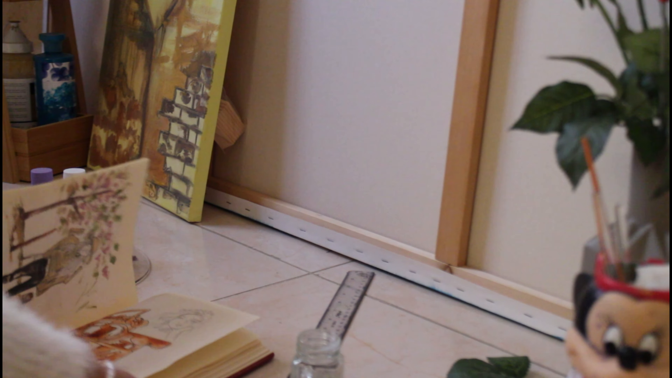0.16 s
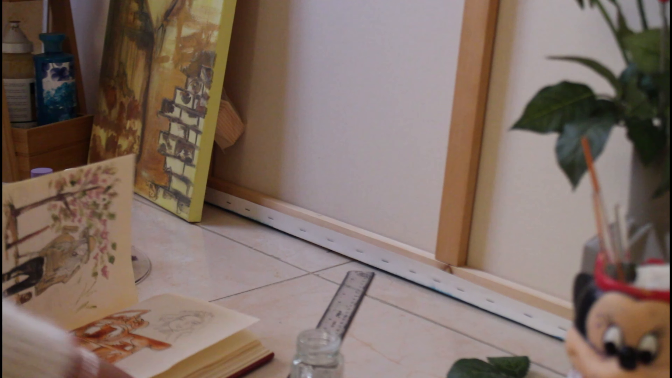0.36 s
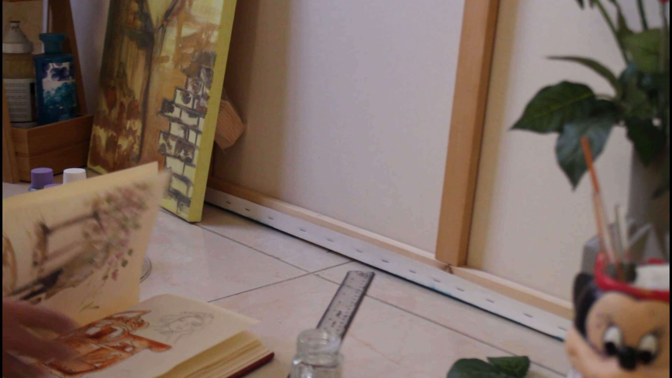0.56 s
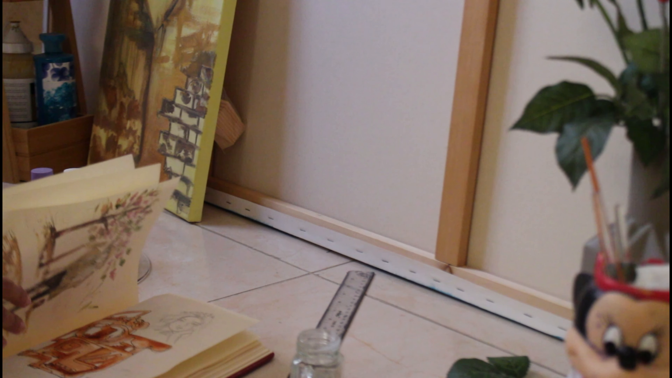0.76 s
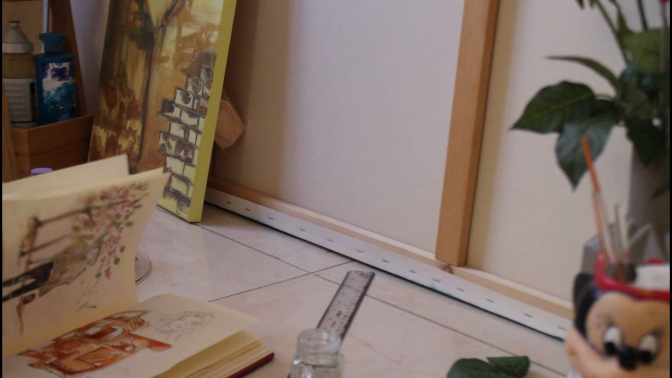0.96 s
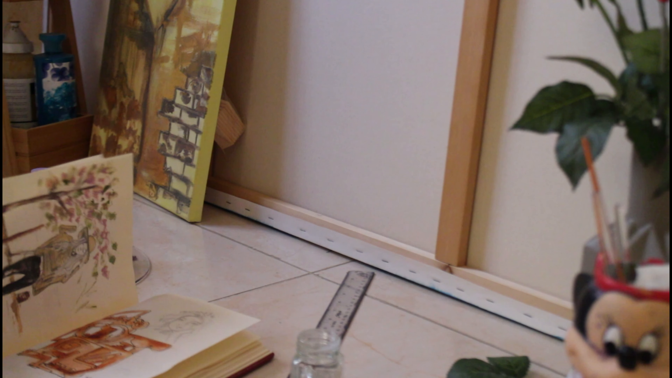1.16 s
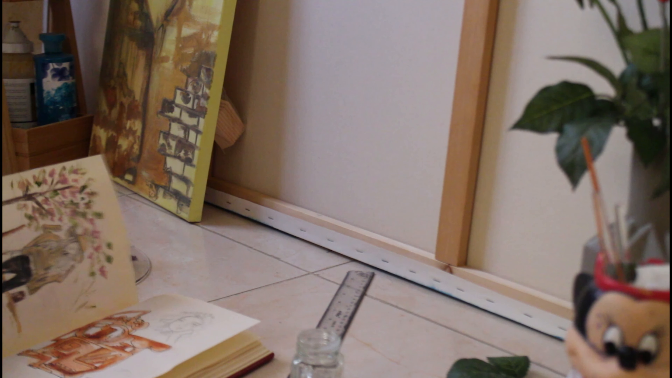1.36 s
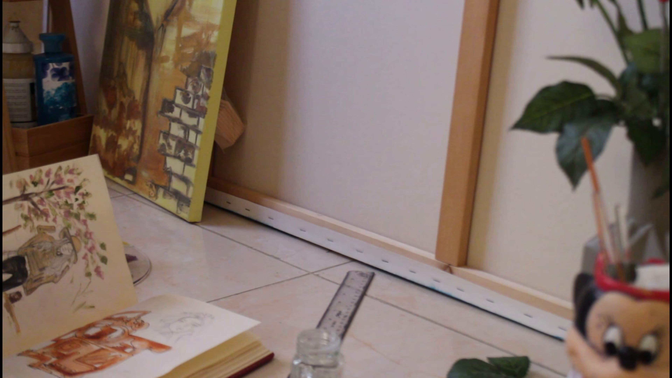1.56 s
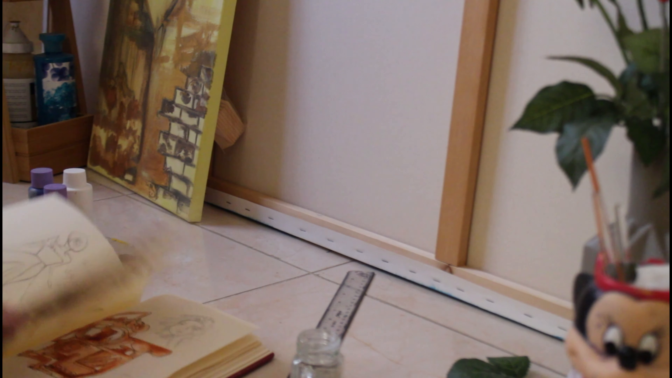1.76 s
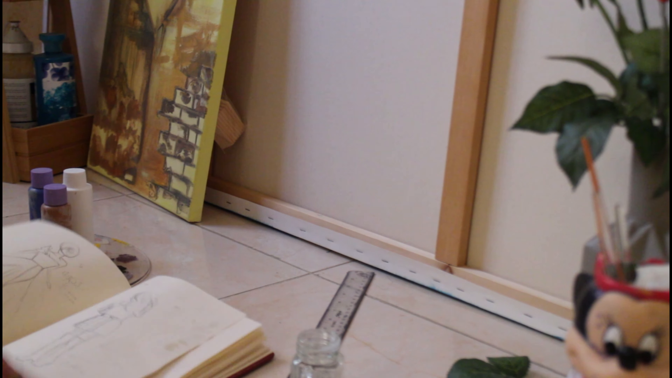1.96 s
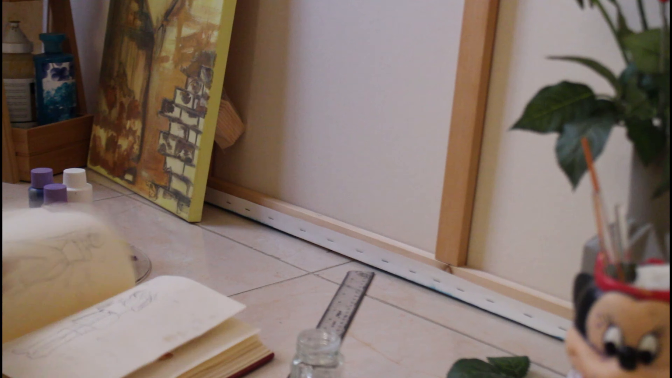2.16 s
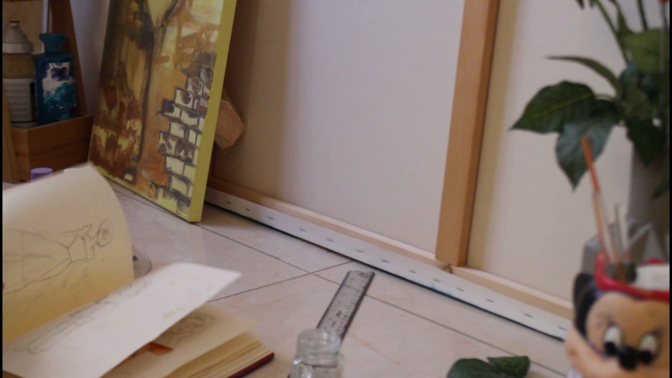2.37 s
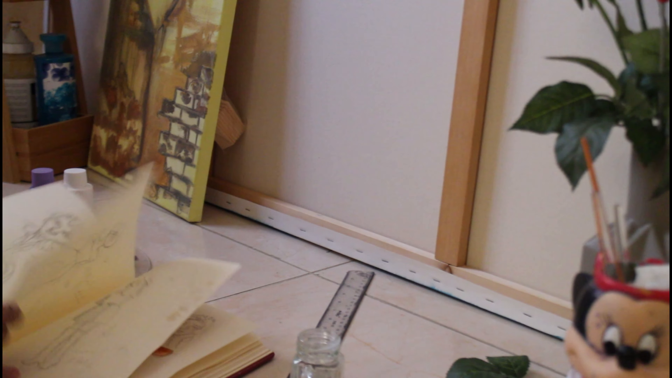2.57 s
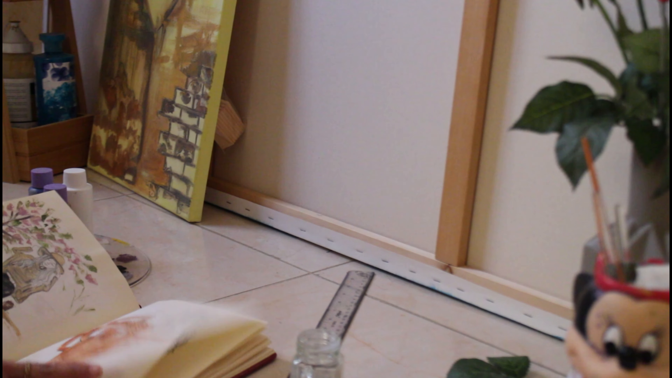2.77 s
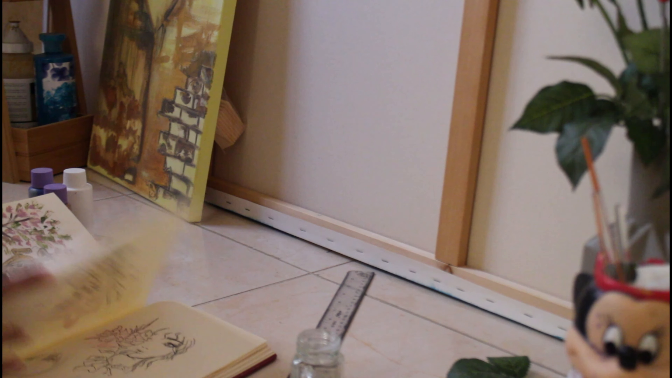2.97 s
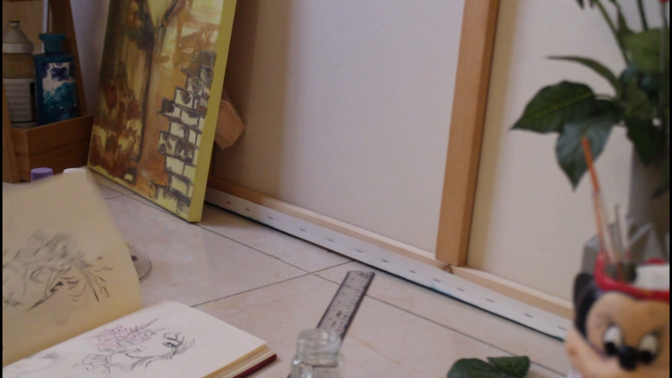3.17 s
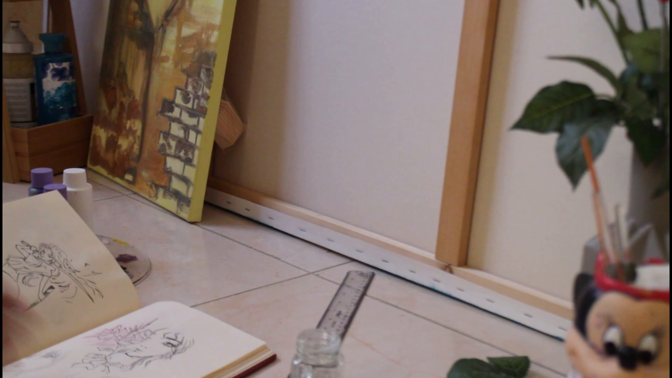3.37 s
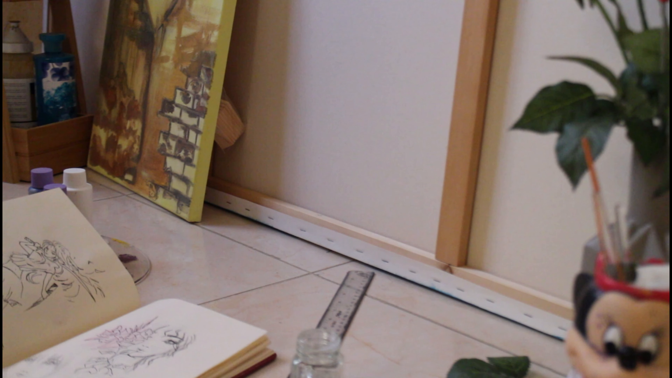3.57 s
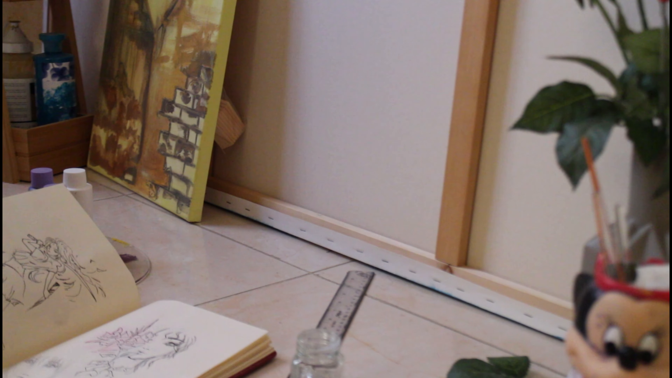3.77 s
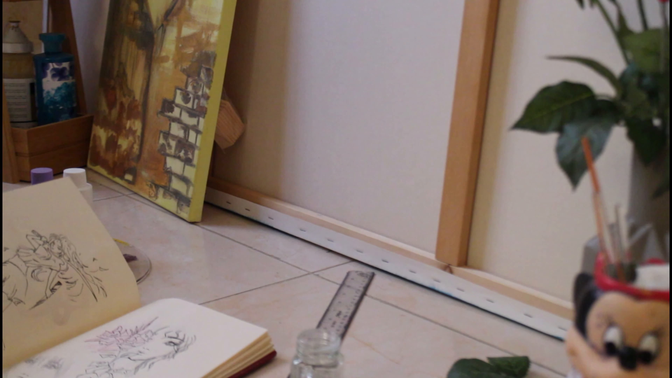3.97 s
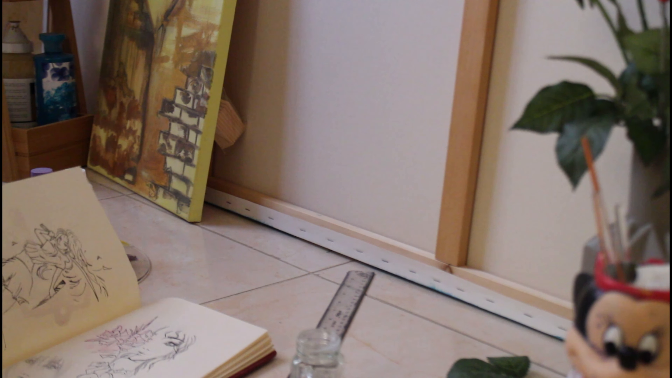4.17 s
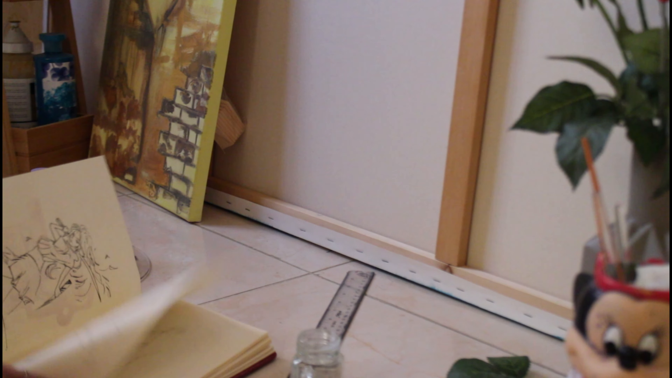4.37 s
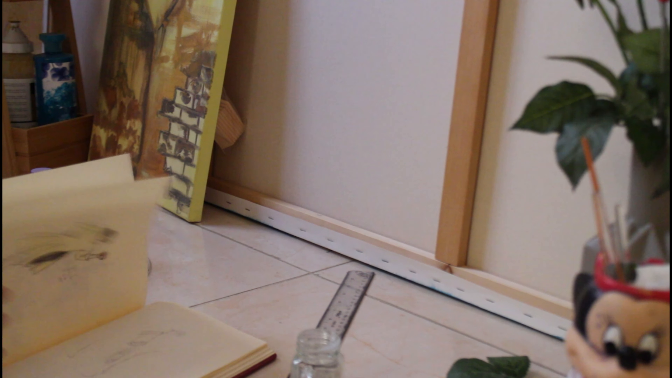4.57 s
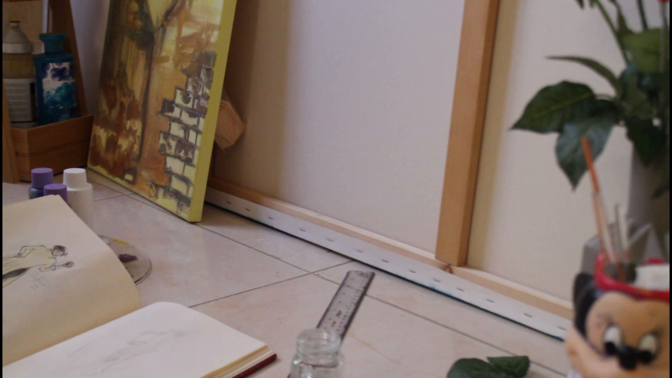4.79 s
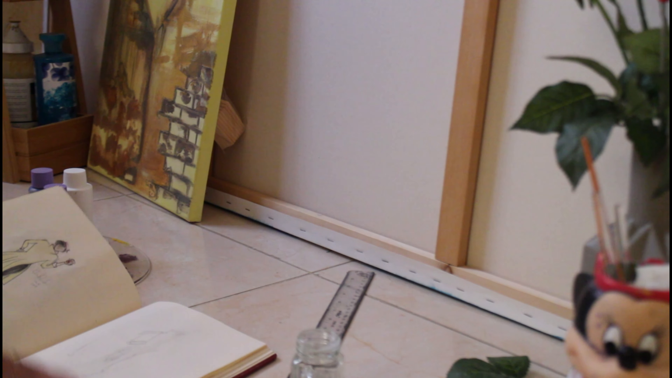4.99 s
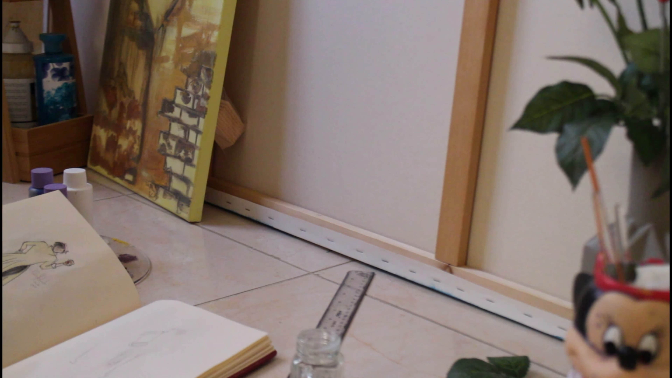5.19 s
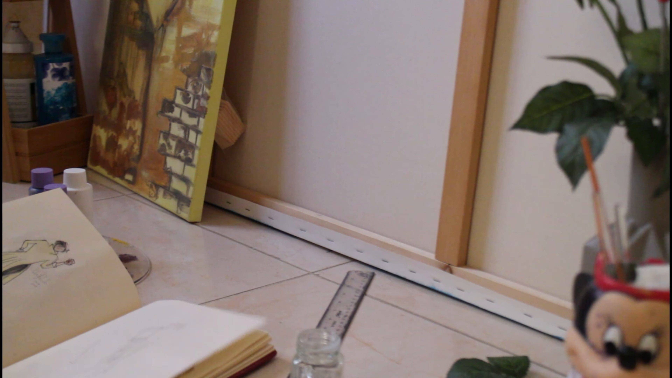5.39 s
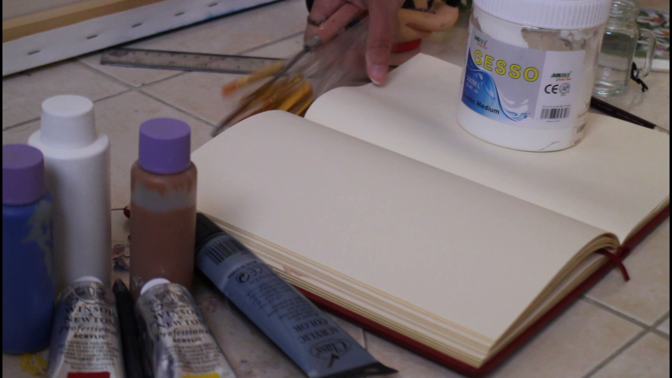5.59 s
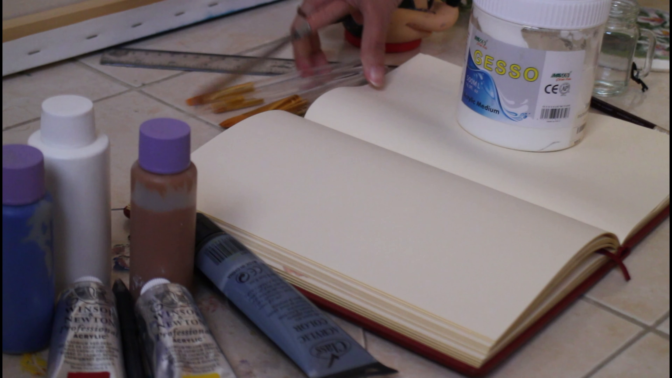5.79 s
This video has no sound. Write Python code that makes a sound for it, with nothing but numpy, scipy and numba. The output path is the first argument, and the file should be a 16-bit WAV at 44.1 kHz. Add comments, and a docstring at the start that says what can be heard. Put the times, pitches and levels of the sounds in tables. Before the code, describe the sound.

Dry paper swishes and sharp page flaps in a hard live room, a quiet pause midway, ending with a short rattle of brush handles.

```python
"""A bare, echoing room with a tiled floor: stiff sketchbook pages are turned by hand.
Each sheet slides off its neighbour (filtered grains of friction), buckles and flaps over (short bursts of snaps).
Near the end a bundle of paintbrushes clatters onto the tiles: such bursts also ring the modes of the handles.
A lens motor ticks faintly in short, dying tones over still air of coloured noise.
The echo, noise fading in bands, twice stops dead; after the second stop the air is a little stronger."""
import sys
import numpy as np
from scipy import signal
from scipy.fft import rfft, irfft, next_fast_len
from scipy.io import wavfile
from numba import njit

SR = 44100
rng = np.random.default_rng(int(sys.argv[2]) if len(sys.argv) > 2 else 0)


def transcribe(signal):
    """Save signal, clipped to [-1, 1], as a 16-bit WAV file at the path in sys.argv[1]."""
    frames = np.atleast_2d(signal).T
    limited = np.clip(frames, -1, 1)
    pcm = np.round(limited * 32767).astype(np.int16)
    wavfile.write(sys.argv[1], SR, pcm)


N = 257544
TIME = np.arange(N) / SR
SIDES = np.array([[1], [-1]])  # sign of a side signal at left and right
TOP_HZ = 15750
# Moments at which the echo stops dead. Each entry: time in seconds.
ECHO_STOPS = [2.651, 5.483]


def sliding(rate=16000, spread_db=1.5, judder_db=1.09, pocket_db=1.5, pocket_damping=0.565,
            sharpen=0.83, trim_db=(-3.5, -5, -4.5)):
    """Sheet rubs on sheet: fine slips sound in the body, the face and the edge of the page."""
    # Tone of paper friction. Each row: frequency in Hz, relative level in dB per Hz.
    slide_colour = [(100, -19.5), (250, -18.5), (500, -16), (900, -7.5), (1500, 0.5), (2200, -1), (3300, 2),
                    (5500, -0.5), (7200, -8), (9500, -15), (11500, -24.5), (15500, -28)]
    # Body, face and edge of the sliding page. Each row: low and high limit in Hz.
    slide_bands = [(100, 1100), (1100, 4500), (4500, 15500)]
    # A wide gap has a low pocket and lets the body sound. Each row: pocket in Hz, relative body level in dB.
    gap_body = [(1400, 2.5), (2000, -5.5), (3000, -26)]
    level_db, edge_db, pocket_hz = strokes()

    def friction(edges):
        rubbed = colour(grains(N, rate, spread_db), slide_colour)
        return unit(band(rubbed, edges))

    body, face, edge = (friction(edges) for edges in slide_bands)
    # the air between the sheets rings at a gliding pitch
    pocket_noise = band(grains(N, rate, spread_db), (600, 6000), order=2)
    pocket = resonate(pocket_noise, pocket_hz, pocket_damping)
    face = face + undb(pocket_db) * unit(pocket / np.sqrt(pocket_hz))
    # the more the page rides on its edge, the finer the hiss
    edge = edge + friction((7500, 15000)) * undb(sharpen * edge_db - 3.5)

    parts = (body * undb(along(gap_body, pocket_hz)), face, edge * undb(edge_db))
    page = sum(part * undb(trim) for part, trim in zip(parts, trim_db))
    return undb(level_db + judder_db * walk(70)) * page


def strokes(depth_db=17.5, opening_s=0.0812, edge_db_per_s=-6):
    """Strokes swell, hold and die as their pockets settle: gives scrape dB, edge dB and pocket Hz over time."""
    # Sheets sliding off their neighbours. Each row: start, rise, hold and release in seconds,
    # scrape level in dB before trims, initial edge hiss in relative dB, air pocket at first and at last in Hz.
    stroke_rows = [(0.0, 0.0026, 0.131, 0.65, -74.5, 3, 1900, 1610),
                   (0.449, 0.14, 0.081, 0.163, -56, -1, 3130, 2300),
                   (0.703, 0.099, 0.07, 0.25, -60, 0, 2500, 2270),
                   (0.962, 0.031, 0.206, 0.34, -62.5, -3, 2170, 1940),
                   (1.087, 0.047, 0.0246, 0.09, -58, 3.5, 2414, 3400),
                   (1.365, 0.02, 0.1665, 0.17, -58.5, -1.5, 2070, 2260),
                   (1.587, 0.051, 0.057, 0.25, -64, -7.5, 1870, 1500),
                   (1.862, 0.0236, 0.28, 0.11, -60.5, -3.5, 2200, 2070),
                   (2.08, 0.092, 0.023, 0.3, -53, 0.5, 2320, 1860),
                   (2.376, 0.0618, 0.0094, 0.12, -54.5, 1, 2300, 1700),
                   (2.762, 0.048, 0.159, 0.12, -59.5, 5.5, 3450, 1770),
                   (2.978, 0.0376, 0.187, 0.105, -58, 0.5, 1390, 1290),
                   (4.223, 0.026, 0.107, 0.05, -61.5, 4, 3460, 3700),
                   (4.342, 0.023, 0.036, 0.17, -56, 3, 2590, 1660),
                   (4.42, 0.031, 0.033, 0.23, -62, 2.5, 1500, 1600),
                   (5.373, 0.094, 0.013, 0.0061, -60.5, 1.5, 2200, 2300)]
    start, rise, hold, release, db, edge_db, first_hz, last_hz = np.transpose(stroke_rows)[..., None]
    age = TIME - start
    # a stroke gains depth_db in its rise and loses it in its release
    away = np.maximum(1 - age / rise, 0) + np.maximum(age - rise - hold, 0) / release
    power = undb(np.maximum(db - depth_db * away, -150)) ** 2
    total = power.sum(axis=0)
    share = power / total  # overlapping strokes count by their power
    # the edge hiss fades as the page lifts
    lifted = np.clip(age - rise, 0, hold + release)
    edge = share * (edge_db + edge_db_per_s * lifted)
    settling = np.exp(-(np.maximum(age, 0) / (rise / 2 + opening_s)) ** 2)
    pocket_hz = share * (last_hz + (first_hz - last_hz) * settling)
    return 10 * np.log10(total), edge.sum(axis=0), pocket_hz.sum(axis=0)


def pages(level_db=-1.5):
    """Sheets buckle as they are lifted; a page that flaps over snaps free, slaps down and settles."""
    # Whole pages flapping over. Each row: start in seconds, levels of snap, slap and settling
    # in dB before the trim, crack of the snap in relative dB, sheet ring in Hz.
    landings = [(2.218, -45.5, -43, -51.5, 4.5, 1760), (2.469, -47, -40.5, -46, 9, 1830),
                (4.559, -52.5, -37, -45, 11.5, 2840)]
    # Sheets buckled or flicked, and a few soft taps on the book. Each row: start in seconds, length scale in
    # seconds, level in dB before the trim, crack in relative dB, sheet ring in Hz.
    flicks = [(0.157, 0.0139, -68, -13.5, 1290), (0.56, 0.0087, -62, -2.5, 926),
              (0.694, 0.00574, -53, 0.5, 2170), (1.128, 0.013, -58, 1.5, 1500),
              (1.393, 0.011, -46.5, -2.5, 2120), (1.766, 0.00734, -60, -6, 810),
              (1.833, 0.004, -59.5, -4, 1010), (1.878, 0.0056, -47, -3.5, 2320),
              (1.895, 0.0028, -54, 3.5, 2300), (2.163, 0.0095, -52, -5, 1195),
              (2.595, 0.025, -54, -7.5, 1500), (2.819, 0.0088, -56.5, -10, 1490),
              (2.869, 0.0131, -52.5, -11.5, 1390), (2.887, 0.018, -50.5, -3.5, 1374),
              (2.991, 0.0029, -45, -19.5, 1390), (3.028, 0.0139, -52.5, 2, 1280),
              (3.088, 0.0049, -53.5, 6.5, 1400), (3.097, 0.005, -51, 6, 1108),
              (3.119, 0.00775, -50.5, -5.5, 950), (3.142, 0.00423, -51, -2.5, 1160),
              (3.197, 0.0061, -55, -2, 1400), (3.219, 0.026, -51, -3, 1370),
              (4.361, 0.0039, -47.5, 1, 2200), (4.45, 0.0072, -54.5, -5, 985),
              (5.137, 0.0039, -72, -9.5, 820), (5.426, 0.0058, -66, 4.5, 2000)]
    slap_after_s, settle_after_s = 0.0095, 0.04
    slap_crack_share = 0.18  # part of the snap's crack dB kept by the slap
    out = np.zeros(N)
    for start, snap_db, slap_db, settle_db, crack_db, hz in landings:
        add(out, flap(0.0098, snap_db, crack_db, hz), start)
        add(out, flap(0.018, slap_db, slap_crack_share * crack_db, hz), start + slap_after_s)
        add(out, flap(0.041, settle_db, crack_db=-6, hz=1570), start + settle_after_s)
    for start, *flick in flicks:
        add(out, flap(*flick), start)
    return undb(level_db) * out


def flap(length, db, crack_db, hz, ring_db=0.5, ring_damping=0.24, thump_db=-18):
    """One blow of stiff paper pushes air aside, and the bent sheet rings briefly."""
    # Tone of struck paper. Each row: frequency in Hz, relative level in dB per Hz.
    flap_colour = [(90, -27.5), (150, -24), (310, -10.5), (480, -15), (640, -3.5), (1000, -2), (1450, 0),
                   (2100, 0), (3100, -1.5), (4300, -6.5), (6000, -14), (8000, -21.5), (10000, -29.5),
                   (15500, -62)]
    # A larger bend rings lower and mostly has more body. Each row: sheet ring in Hz, relative body level in dB.
    bend_body = [(820, 6), (1350, -5.5), (2200, -7)]
    # longer blows are duller: the edge loses 3 dB per doubling of length
    edge_db = crack_db - 6.5 - 3 * np.log2(length / 0.0098)
    bands_db = db + np.array([thump_db, along(bend_body, hz), 0, crack_db, edge_db])
    slap = blow(length, bands_db, flap_colour, rise=0.35, rate=14000, spread_db=4.0)
    bend = blow(length, bands_db, flap_colour, rise=0.5, rate=15000, spread_db=5.0)
    ring = resonate(bend, np.full(len(bend), float(hz)), ring_damping)
    return slap + undb(ring_db) * ring


def brushes(level_db=0, ring_db=-9, detune=0.071, count=3):
    """Thin handles clatter and bounce ever softer; each hit briefly rings wooden modes at its own pitch."""
    # Brush handles hitting the tiles and each other. Each row: start in seconds,
    # length scale in seconds, level in dB, tick in relative dB.
    clacks = [(5.612, 0.0034, -73.5, 30), (5.639, 0.02, -66, 24.5), (5.665, 0.0037, -56, 21.5),
              (5.675, 0.0061, -37, 8.5), (5.687, 0.0056, -49.5, 9), (5.6978, 0.00199, -47.5, 22),
              (5.707, 0.0068, -39.5, 4.5), (5.718, 0.0108, -46.5, 12), (5.727, 0.0077, -42, 1),
              (5.743, 0.0024, -52.5, 24)]
    # Tone of the knocks. Each row: frequency in Hz, relative level in dB per Hz.
    brush_colour = [(100, -42), (190, -19), (330, -4.5), (480, -9), (700, 1), (1200, -7.5), (2100, -1.5),
                    (3200, 2.5), (4700, -2), (5800, -6), (6600, -5), (9300, -4), (11000, -12.5),
                    (15500, -21.5)]
    # Modes of a wooden handle. Each row: frequency in Hz before detuning, relative level in dB,
    # time to fall by 60 dB in seconds.
    handle_modes = [(670, -14, 0.021), (2128, 11.5, 0.035), (2630, -5, .03), (4406, 8, 0.036),
                    (5837, 15, 0.103), (7620, 5.5, 0.035), (8800, 4, 0.0266)]
    thud_db, knock_db, crack_share = -23, -6, 0.28  # the crack takes this share of the tick's dB
    first_bounce_s, gap_s, step_db = 5.757, 0.02, -1
    bounces = []
    for k in range(count):
        start = first_bounce_s + k * gap_s * rng.uniform(0.83, 1.1)
        bounces.append((start, 0.00643, -49 + k * step_db, 2))  # columns as in clacks

    out = np.zeros(N)
    t = TIME[:SR // 12]
    for start, length, hit_db, tick_db in [*clacks, *bounces]:
        pitch = 1 + detune * rng.standard_normal()
        bands_db = hit_db + np.array([thud_db, knock_db, 0, crack_share * tick_db, tick_db])
        knock = blow(length, bands_db, brush_colour, rise=0.54, rate=14000, spread_db=1.53)
        wood = sum(undb(db - 60 * t / t60) * np.sin(2 * np.pi * hz * pitch * t)
                   for hz, db, t60 in handle_modes)
        ring = signal.fftconvolve(knock, wood)[:len(knock)]
        add(out, knock + undb(ring_db) * np.std(knock) * unit(ring), start)
    return undb(level_db) * out


def blow(length, bands_db, spectrum, rise, rate, spread_db, swell=1.436, bass_lag=1.12):
    """One blow: a quick cluster of snaps swells and dies on the scale of its length; the lows come later."""
    # Thump, body, slap, crack and edge of a blow. Each row: low and high limit in Hz.
    blow_bands = [(100, 400), (400, 1100), (1100, 2300), (2300, 5000), (5000, 15500)]
    size = int(SR * (.03 + 3 * length))
    out = 0
    for k, (edges, db) in enumerate(zip(blow_bands, bands_db)):
        peak_s = max(rise, .05) * length * bass_lag ** (2 - k)
        age = TIME[:size] / peak_s
        snaps = colour(grains(size, rate, spread_db), spectrum) * (age * np.exp(-age)) ** swell
        out = out + unit(band(snaps, edges, order=3)) * undb(db)
    return out * np.sqrt(length * SR / size)


def grains(size, rate, spread_db):
    """Fibres catch and let go: random impulses of either sign, many tiny slips and a few larger."""
    strength = undb(spread_db * np.minimum(rng.exponential(size=size), 3))
    sign = np.sign(rng.standard_normal(size))
    slips = rng.random(size) < rate / SR  # rate in slips per second
    return unit(sign * strength * slips)


@njit
def resonate(x, hz, damping):
    """State-variable band-pass whose centre can move."""
    y, band_state, low_state = np.empty(len(x)), 0., 0.
    for i in range(len(x)):
        g = np.tan(np.pi * hz[i] / SR)
        v = (band_state + g * (x[i] - low_state)) / (1 + g * (g + damping))
        band_state = 2 * v - band_state
        low_state = low_state + 2 * g * v
        y[i] = damping * v
    return y


def widen(x, side_db, spread_s=0.0032):
    """A broad sheet sounds from many places at once: random short lags make a side signal."""
    lags = rng.standard_normal(int(spread_s * SR))
    side = signal.oaconvolve(x, lags / np.linalg.norm(lags))[:N]
    return x + undb(side_db) * side * SIDES


def room(sent, turn_hz=6):
    """Moving sources face other walls from moment to moment: two echo patterns alternate, cut at each stop."""
    turn = 2 * np.pi * turn_hz * TIME
    sent = sent * np.array([np.cos(turn), np.sin(turn)])
    walls = np.array([room_response(), room_response()])
    stretches = np.split(sent[:, None], [int(s * SR) for s in ECHO_STOPS], axis=2)
    echoes = []
    for part in stretches:
        echo = signal.fftconvolve(part, walls, axes=2).sum(axis=0)
        echoes.append(echo[:, :part.shape[2]])  # no tail runs past a stop
    return np.hstack(echoes)


def room_response():
    """Diffuse echoes of hard walls: bands of noise, each with its own decay, level and width."""
    # Decay of the room. Each row: frequency in Hz, time to fall by 60 dB in seconds.
    room_t60 = [(150, 0.37), (500, 0.518), (1500, 0.51), (3000, 0.45), (6000, 0.57), (12000, 0.54)]
    # Strength of the room. Each row: frequency in Hz, echo against direct sound in dB before the sends.
    room_echo = [(150, 3), (500, 0.5), (1500, 2), (3000, -0.5), (6000, -3.5), (12000, -1)]
    # Width of the room. Each row: frequency in Hz, side against mid in dB.
    room_side = [(150, -18), (600, -18.5), (1800, -10), (4500, -10), (12000, 1.5)]
    t = TIME[:int(SR * .55)]
    edges = np.geomspace(90, 16000, 14)
    out = 0
    for lo, hi in zip(edges, edges[1:]):
        hz = np.sqrt(lo * hi)
        fade = undb(-60 * t / along(room_t60, hz)) * (1 - np.exp(-t / 0.001))
        mid, side = (unit(band(rng.standard_normal(len(t)), (lo, hi)) * fade) for _ in range(2))
        pair = mid + SIDES * side * undb(along(room_side, hz))
        out = out + pair * undb(along(room_echo, hz)) * np.sqrt(2 * (hi - lo) / SR / len(t))
    return out


def lens_motor(level_db=-1, t60=0.058, hollow_hz=460, hollow_db=-7, soft_s=0.0036, faint_db=-71,
               scatter_db=3.0, faint_hz=(420, 520)):
    """A lens motor steps in dull blips, mostly faint, each with its own pitch over one hollow note."""
    # The stronger steps. Each row: start in seconds, level of the main tone in dB before the trim, ring in Hz.
    lens_steps = [(0.119, -62.5, 480), (0.245, -63, 602), (0.495, -59.5, 589.7), (0.704, -59.5, 599.4),
                  (0.997, -61.5, 606), (1.25, -61.5, 438), (1.996, -63, 455), (3.425, -66.5, 457),
                  (3.509, -66, 434), (3.718, -63.5, 565.7), (3.918, -62.5, 681), (3.969, -60.5, 610),
                  (4.177, -59.5, 586), (4.344, -60, 427), (4.927, -62.5, 605), (5.095, -63.5, 480),
                  (5.389, -63, 458.2)]
    step_s = 2 / 24  # spacing of the faint steps
    # faint steps keep clear of the stronger ones
    free = [s for s in np.arange(0, TIME[-1], step_s)
            if all(abs(s - strong[0]) > step_s / 2 for strong in lens_steps)]
    faint = [(s, faint_db + scatter_db * rng.standard_normal(), rng.uniform(*faint_hz)) for s in free]

    out = np.zeros((2, N))
    t = TIME[:SR // 8]
    fade = undb(-60 * t / t60) * (1 - np.exp(-t / soft_s))
    for start, db, hz in [*lens_steps, *faint]:
        phase = rng.normal(0, 0.65, (2, 1))  # it reaches each side at another phase
        ring = np.sin(2 * np.pi * hz * t + phase)
        hollow = undb(hollow_db) * np.sin(2 * np.pi * hollow_hz * t - phase)
        add(out, undb(db + level_db) * (ring + hollow) * fade / fade.max(), start)
    return out


def still_air(air_db=-69.5, mid_db=-1, side_db=-1, waver_db=-0.07, late_db=3):
    """Faint noise and hiss from independent mid and side; the mid is stronger after the last echo stop."""
    # Tone of the still room. Each row: frequency in Hz, relative level in dB per Hz.
    air_colour = [(20, -7.5), (50, -33), (72, -5), (90, -11), (115, -7.5), (190, -12.5), (300, -9.5),
                  (450, -4.5), (620, -5.5), (750, -8.5), (1400, -11), (2600, -15), (10000, -24),
                  (15500, -23.5)]
    # Width of the still room. Each row: frequency in Hz, side against mid in dB before trims.
    air_side = [(25, 0.5), (70, -36), (130, 0), (400, 0), (1500, 5.5), (5000, 1.5), (13000, 2)]
    mid, side = (unit(colour(rng.standard_normal(N), air_colour)) * undb(air_db + waver_db * walk(6.0))
                 for _ in range(2))
    mid = mid * undb(mid_db + late_db * (TIME > ECHO_STOPS[-1]))
    return mid + undb(side_db) * colour(side, air_side) * SIDES


def undb(db):
    """Decibels to gain."""
    return np.exp(np.asarray(db) * np.log(10) / 20)


def unit(x):
    """Scale to rms 1."""
    return x / np.sqrt(np.mean(x ** 2) + 1e-30)


def along(points, hz):
    """Read (Hz, value) points on a log-frequency axis."""
    f, value = np.transpose(points)
    return np.interp(np.log(np.maximum(hz, 1)), np.log(f), value)


def colour(x, points, share=1):
    """Filter with a (Hz, dB) spectrum, its dB scaled by share."""
    length = x.shape[-1]
    size = next_fast_len(length, True)
    gain = undb(share * along(points, np.fft.rfftfreq(size, 1 / SR)))
    return irfft(rfft(x, size) * gain, size)[..., :length]


def band(x, edges, order=4):
    """Causal band-pass."""
    return signal.sosfilt(signal.butter(order, edges, "band", fs=SR, output="sos"), x)


def walk(rate):
    """Random values, rate of them per second, joined by straight lines."""
    knots = rng.standard_normal(int(N / SR * rate) + 2)
    return np.interp(TIME * rate, np.arange(len(knots)), knots)


def add(track, sound, s):
    """Mix a sound into a track from time s on."""
    part = track[..., int(s * SR):int(s * SR) + sound.shape[-1]]
    part += sound[..., :part.shape[-1]]


def scene(slide_echo_db=-4.0, slide_side_db=-9, brush_echo_db=-2):
    """Paper and brushes sound in the room, the upper range leaning right, over lens ticks and still air."""
    # Reflections off the tiles and the microphone's own colour. Each row: frequency in Hz, gain in dB.
    place_colour = [(90, -11.5), (150, 2.5), (205, -6.5), (295, 1.5), (400, 4.5), (620, 1), (10500, -1),
                    (11200, -6), (11800, -3.5)]
    # Microphone balance. Each row: frequency in Hz, left minus right in dB.
    balance = [(200, 0.5), (600, 0.1), (1200, -2.5), (2200, -1), (4000, -2), (8000, -2.5), (14000, -3.5)]
    slide, flaps, clatter = sliding(), pages(), brushes()
    direct = widen(slide, slide_side_db) + flaps + clatter
    echo = room(undb(slide_echo_db) * slide + flaps + undb(brush_echo_db) * clatter)
    placed = colour(direct + echo, place_colour)
    near = colour(placed, balance, SIDES / 2)  # half the difference goes to each side
    return near + lens_motor() + still_air()


def record(dry):
    """A steep elliptic low-pass cuts the top."""
    return signal.sosfilt(signal.ellip(10, .1, 80, TOP_HZ, fs=SR, output="sos"), dry)


dry = scene()
out = record(dry)
transcribe(out)
```